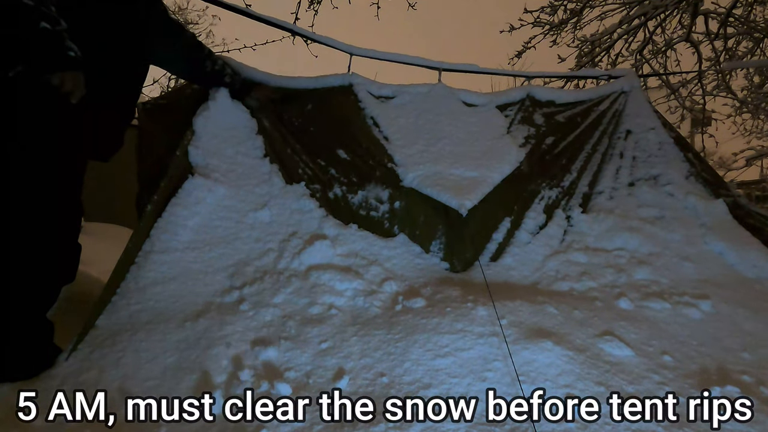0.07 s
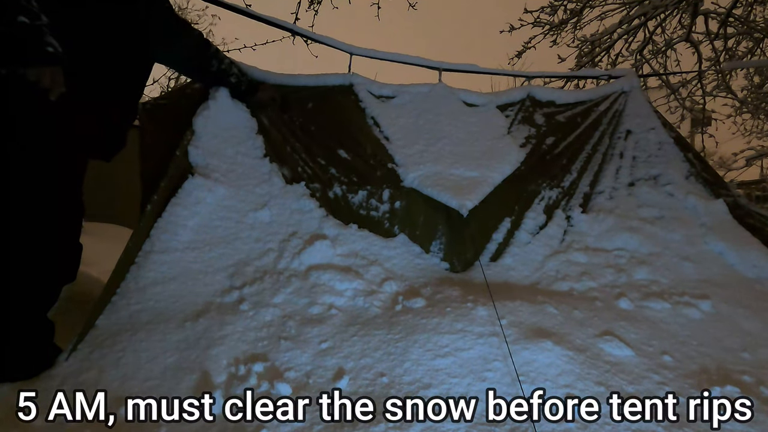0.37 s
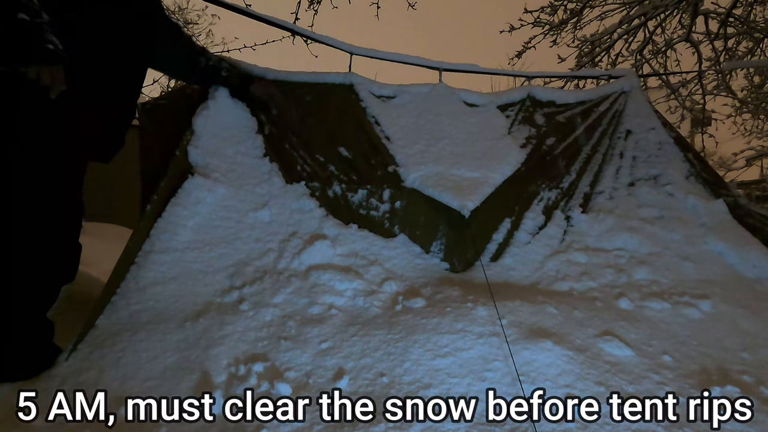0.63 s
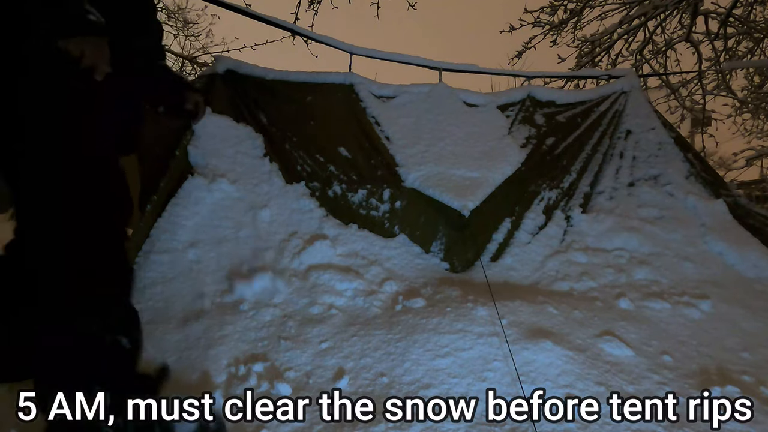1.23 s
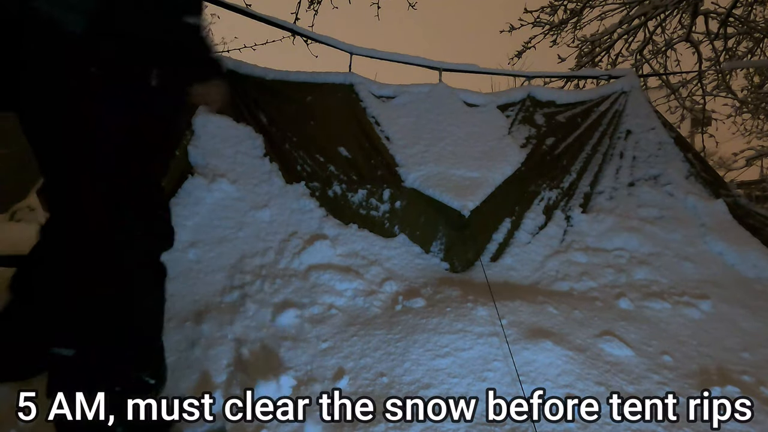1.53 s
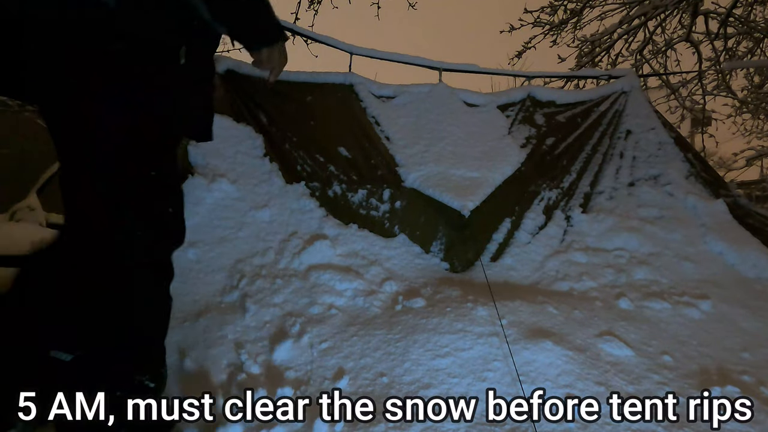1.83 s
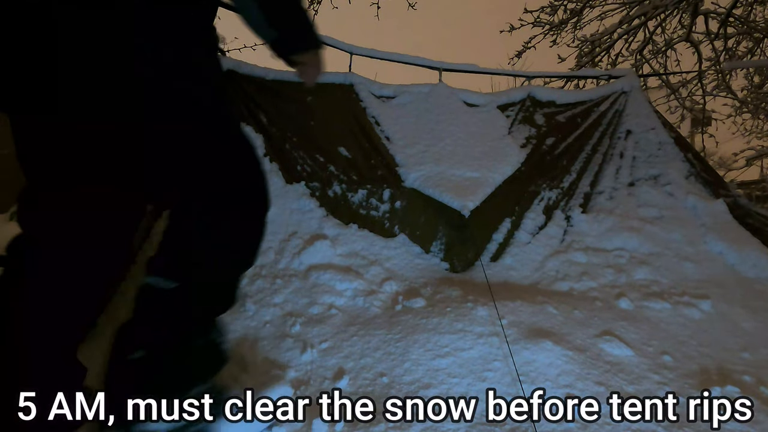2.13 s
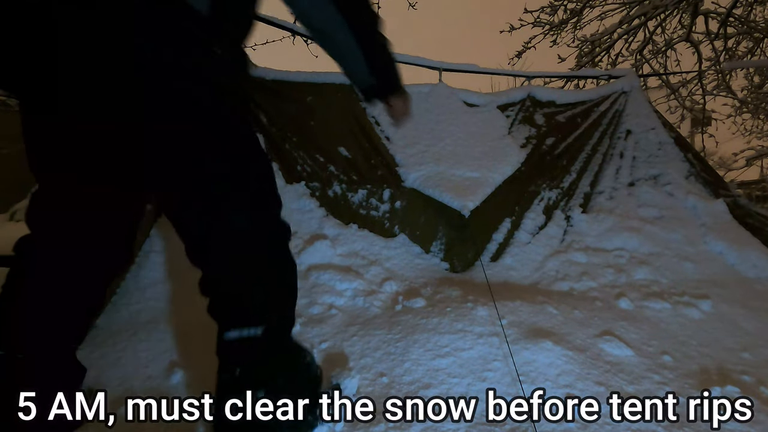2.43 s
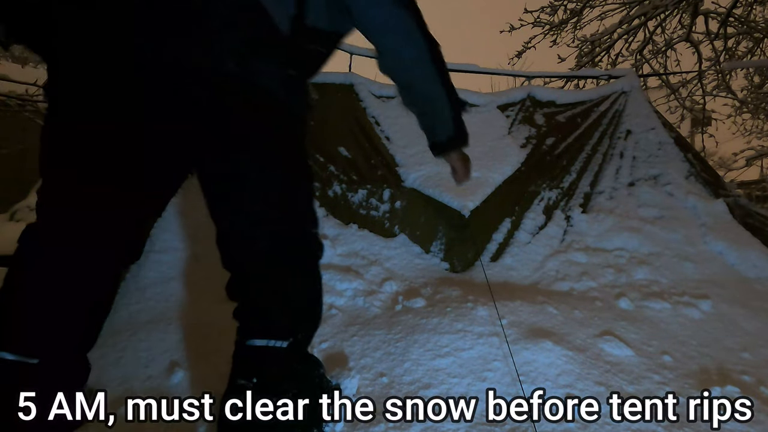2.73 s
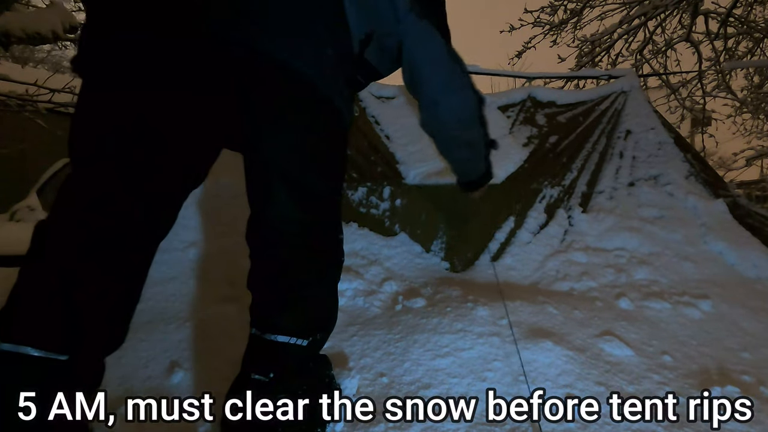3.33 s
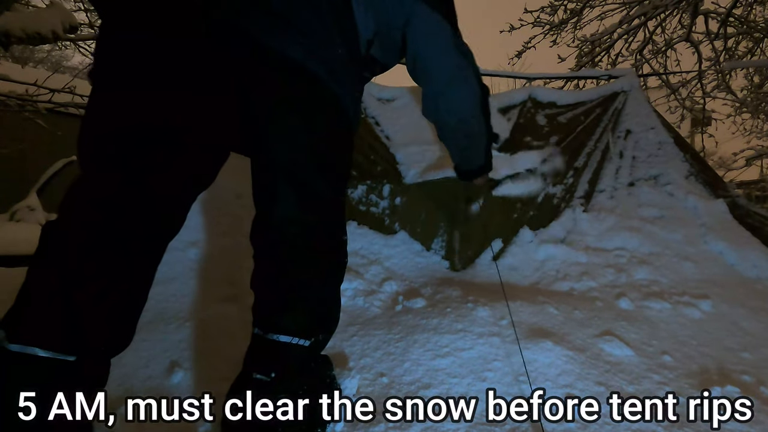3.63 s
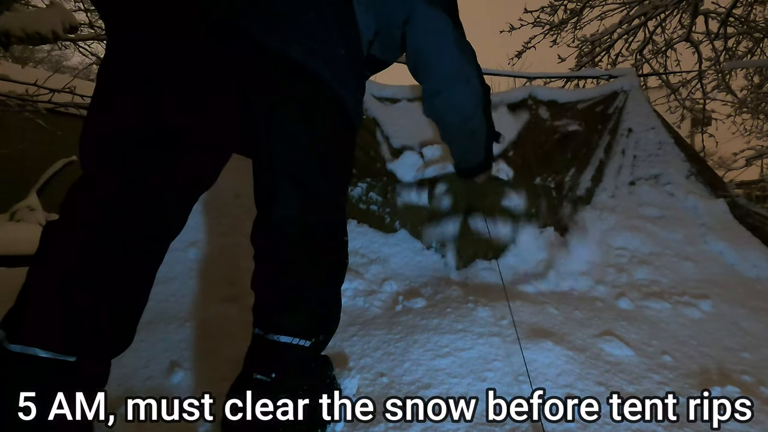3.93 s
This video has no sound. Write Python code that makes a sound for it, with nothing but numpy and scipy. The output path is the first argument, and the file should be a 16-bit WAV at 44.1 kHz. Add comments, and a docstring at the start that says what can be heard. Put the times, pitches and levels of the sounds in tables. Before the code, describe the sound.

A hand sweeps snow off a tent, the fabric rubbing and the grains hissing down. A few dull, crunchy steps in deep snow follow, then louder sweeps. Small ticks and crackles sound close by, over low outdoor wind.

```python
"""Snow hisses down a tent as a hand sweeps it off; a few steps through deep snow follow, then more sweeps.
The hand rubs and heaves the fabric, grains skitter over it and the sleeve rustles.
Boots pack the snow with dull, crunchy thuds; frozen crust and cloth crackle.
Small hard ticks come from near the walker, over a low wind rumble and a soft outdoor wash."""
import sys
import numpy as np
from scipy import signal
from scipy.fft import rfft, irfft
from scipy.io import wavfile

SR = 44100
rng = np.random.default_rng(int(sys.argv[2]) if len(sys.argv) > 2 else 0)


def digitize_waveform(pressure):
    """Quantize a signal to 16-bit integers and store it at the path in sys.argv[1].

    Rows of a 2-D input are taken as channels; values are limited to [-1, 1].
    """
    field = np.atleast_2d(pressure).T
    bounded = np.clip(field, -1, 1)
    quanta = np.round(bounded * 32767).astype(np.int16)
    wavfile.write(sys.argv[1], SR, quanta)


N = 176400
T = np.arange(N) / SR

# hand strokes on snowy cloth: (peak time [s], rise [s], fall [s], hiss level [dB], rub level [dB])
SWEEPS = [(.005, 0.062, 0.06, -46, -42.5), (.1, 0.036, 0.11, -47, -40), (.21, 0.027, 0.039, -50.5, -42.5),
          (.37, 0.14, 0.15, -53.5, -45.5), (0.626, 0.061, 0.074, -51, -46.5), (.8, 0.078, 0.16, -57, -50),
          (1.25, 0.19, 0.32, -65.5, -55), (1.47, 0.12, 0.053, -59.5, -52), (1.59, 0.034, 0.19, -65, -51),
          (2.027, 0.026, 0.022, -51.5, -50), (2.1, 0.046, 0.13, -61.5, -53), (2.52, .12, 0.13, -58, -52),
          (2.74, 0.043, 0.042, -60.5, -45), (3.05, 0.36, 0.25, -61, -52), (3.36, 0.067, 0.067, -53, -50),
          (3.489, 0.073, 0.084, -47, -40.5), (3.67, 0.077, 0.038, -43.5, -45),
          (3.762, 0.067, 0.064, -40.5, -37.5), (3.89, 0.076, 0.091, -41.5, -44.5),
          (3.99, 0.057, .08, -48.5, -41.5)]
# crisp sleeve rustles: (peak time [s], rise [s], fall [s], level [dB])
RUSTLES = [(.1, 0.089, 0.16, -60), (.38, 0.15, 0.08, -61), (.64, 0.025, .014, -61.5),
           (2.43, .04, 0.044, -70.5)]
# tone of the sliding grains, rubbed cloth, heaving wall and sleeve: (frequency [Hz], gain [dB])
HISS_EQ = [(1000, -25), (2200, 4), (3200, -3), (4000, -3), (4800, 2), (7400, -2.5), (8600, -9),
           (11000, -15), (12300, -19.5), (14000, -30), (16000, -47)]
RUB_EQ = [(60, -6), (150, 6), (280, -7.5), (520, 0), (1100, 2), (1800, 4.5), (2200, -1), (2900, -13),
          (5000, -14), (12000, -57)]
HEAVE_EQ = [(15, -11), (45, 8), (80, -3), (130, -5), (220, -14.5), (1000, -66)]
SLEEVE_EQ = [(3000, -27), (7500, 4), (12000, -5.5), (15500, -26)]


def sweeps():
    """The hand catches and slips, pushing the tent wall, while grains skitter and the sleeve rustles."""
    catch = wobble(rate_hz=50)  # one stick-slip flutter drives both hiss and rub
    hiss = colour(grains(per_s=14000, spread_db=1.0), HISS_EQ) * amp(1.16 * catch)
    rub = colour(grains(per_s=5000, spread_db=0.5), RUB_EQ) * amp(1.03 * catch)
    heave = amp(0.5) * colour(rng.standard_normal((2, N)), HEAVE_EQ)
    sleeve = colour(grains(per_s=3600, spread_db=5.5), SLEEVE_EQ) * amp(2.8 * wobble(rate_hz=90))
    hiss_level = swells((*timing, hiss_db) for *timing, hiss_db, _ in SWEEPS)
    cloth_level = swells((*timing, rub_db) for *timing, _, rub_db in SWEEPS)
    return hiss * hiss_level + (rub + heave) * cloth_level + sleeve * swells(RUSTLES)


# snow packing under a boot: (peak time [s], rise [s], fall [s], level [dB])
STEPS = [(1.487, 0.05, 0.039, -37), (1.592, 0.037, 0.029, -35), (2.1, 0.08, 0.031, -36.5),
         (2.585, 0.019, 0.063, -40), (2.745, 0.016, 0.023, -35), (3.208, 0.017, 0.0095, -36.5),
         (3.48, 0.031, 0.028, -38.5)]
# snow giving way: (time [s], thud level [dB], starting pitch [Hz], crust level [dB])
THUDS = [(1.476, -20, 140, -48), (1.52, -28, 109, -53), (1.573, -25, 168, -36.5), (1.597, -33.5, 172, -43),
         (1.632, -23, 141, -48), (2.057, -24, 83, -60), (2.129, -22.5, 163, -34), (2.553, -26.5, 126, -50),
         (2.588, -28, 191, -43.5), (2.638, -23.5, 113, -35.5), (2.72, -20, 192, -34),
         (2.763, -33, 198, -41), (2.772, -17.5, 124, -57), (3.197, -23, 89.5, -45),
         (3.751, -27, 226, -34.5)]
# tone of packing snow and of breaking crust: (frequency [Hz], gain [dB])
PACKING_EQ = [(30, 2), (110, 4.5), (320, -3), (600, -12), (1100, -14.5), (2500, -24), (8000, -39),
              (15000, -65)]
CRUST_EQ = [(100, -12), (350, 7), (700, 7.5), (1100, -1.5), (1800, -10.5), (3000, -23), (15000, -59)]
THUD_RISE_S, THUD_SAG_S, CRUST_FALL_S = 0.0026, 0.015, 0.0086
BOOM_HZ, BOOM_DB, BOOM_RISE_S = 51, -11, 0.021  # the low after-swing of each thud


def footsteps():
    """Snow packs in tiny collapses, then gives way in crunchy thuds that sink into a short low boom."""
    out = colour(grains(per_s=2500, spread_db=0.5), PACKING_EQ) * swells(STEPS)
    crust_level = np.zeros((1, N))
    t = np.arange(SR // 5) / SR
    push = pulse(t / THUD_RISE_S) + amp(BOOM_DB) * pulse(t / BOOM_RISE_S)
    crust_burst = (1 - np.exp(-t / 0.00011)) * np.exp(-(t / CRUST_FALL_S) ** 2)
    for s, thud_db, start_hz, crust_db in THUDS:
        pitch_hz = BOOM_HZ + (start_hz - BOOM_HZ) * np.exp(-t / THUD_SAG_S)
        thud = push / push.max() * np.sin(2 * np.pi * np.cumsum(pitch_hz) / SR)
        add(out, s, amp(thud_db) * thud)
        add(crust_level, s, amp(crust_db) * crust_burst)
    return out + crust_level * colour(grains(per_s=8900, spread_db=-3.5), CRUST_EQ)


# dry crackles: (time [s], level [dB], centre frequency [Hz])
CRACKLES = [(.415, -39, 9400), (1.478, -32.5, 2200), (1.576, -31.5, 1660), (1.657, -40, 6960),
            (1.687, -41, 2600), (1.808, -38, 2350), (1.824, -41, 2050), (2.1525, -36, 1020),
            (2.624, -32, 990), (2.696, -38, 2400), (2.6995, -30.5, 1970), (2.866, -38.5, 2860),
            (3.102, -38, 3120), (3.192, -29, 2460), (3.756, -30, 1580)]


def crackles():
    """Frozen crust and cloth crackle in single tiny fractures, a little to the left."""
    out = np.zeros((2, N))
    for s, db, centre_hz in CRACKLES:
        add(out, s, amp(db) * panned(crack(centre_hz), left_db=4))
    return out


def crack(centre_hz):
    """One dry fracture: a pulse that swells for 0.8 of a cycle and dies within a few more."""
    cycles = centre_hz * np.arange(SR // 20) / SR
    return pulse(cycles / .8) * np.sin(2 * np.pi * (cycles + rng.random()))


# the two hits of a double snap: (time [s], level [dB])
SNAPS = [(1.911, -41), (1.9156, -29)]
# tone of a snap: (frequency [Hz], gain [dB])
SNAP_EQ = [(700, -14), (930, 17), (1200, -12), (2200, 11.5), (3000, -7), (3800, -2), (5200, -11),
           (8000, -8.5), (10500, -23), (12000, -9), (14000, -38)]
SNAP_ATTACK_S, SNAP_DECAY_S = 0.00018, 0.0029


def snaps():
    """Two bright puffs of noise land almost together as one sharp snap."""
    out, t = np.zeros((2, N)), np.arange(SR // 20) / SR
    tone = amp(read(SNAP_EQ, np.fft.rfftfreq(len(t), 1 / SR)))
    for s, db in SNAPS:
        noise = irfft(rfft(rng.standard_normal(len(t))) * tone, len(t))
        puff = noise * (1 - np.exp(-t / SNAP_ATTACK_S)) * np.exp(-t / SNAP_DECAY_S)
        add(out, s, amp(db) * panned(puff / abs(puff).max(), left_db=3.5))
    return out


# small hard contacts: (time [s], level [dB], brightness tilt [dB/octave])
TICKS = [(.468, -30, 6), (.701, -37.5, -4), (.775, -43.5, -14), (.983, -42.5, -10), (1.233, -40, 2),
         (1.851, -34, -7.5), (2.585, -36.5, 3), (2.641, -36.5, 12.5)]
# the ring of a tick: (frequency [Hz], gain [dB], time to fade 60 dB [s])
TICK_MODES = [(2054, -2.5, 0.017), (3526, -4.5, 0.012), (3784, -12.5, 0.016), (4750, -15, 0.007),
              (7300, -26, 0.013)]


def ticks():
    """Small hard contacts on the walker's side click and ring a few short modes, differently each time."""
    out, t = np.zeros((2, N)), np.arange(SR // 20) / SR
    hz, mode_db, t60 = np.transpose(TICK_MODES)[:, :, None]
    for s, db, tilt in TICKS:
        detune, phase, damping = rng.standard_normal((3, len(hz), 1))
        strike_db = mode_db + tilt * np.log2(hz / hz[0])
        fade_db = 60 * t / t60 * np.exp(.3 * damping)
        modes = amp(strike_db - fade_db) * np.sin(2 * np.pi * (hz * (1 + .018 * detune) * t + phase))
        ring = modes.sum(0) * (1 - np.exp(-t / .0007))
        click = amp(-10.5) * crack(centre_hz=4000)
        add(out, s, amp(db) * panned(ring / abs(ring).max() + click, left_db=11))
    return out


# swell of the wind: (time [s], level [dB])
GUSTS = [(0, -45), (.9, -40.5), (1.85, -43.5), (2.35, -41.5), (2.8, -38.5), (3.1, -44), (3.4, -40.5),
         (4, -41.5)]
# tone of the wind and of the outdoor wash: (frequency [Hz], gain [dB])
WIND_EQ = [(10, -12), (36, -1.5), (54, 3.5), (72, -3.5), (110, -8), (160, -17), (220, -13.5), (320, -20.5),
           (2000, -76)]
WASH_EQ = [(30, 10), (250, 1), (800, -1), (1400, -2.5), (2000, -6), (2900, -17), (5000, -19), (7400, -22),
           (9000, -28), (12000, -33), (16000, -60)]
WASH_DB = -48.5


def outdoors():
    """The background bed: wind rumbles in slow gusts under a soft, flickering wash."""
    rumble = colour(rng.standard_normal((2, N)), WIND_EQ)
    gust_db = np.interp(T, *np.transpose(GUSTS)) + 0.63 * wobble(rate_hz=0.67)
    wash = colour(rng.standard_normal((2, N)), WASH_EQ) * amp(WASH_DB + 1.3 * wobble(rate_hz=41))
    return rumble * amp(gust_db) + wash


# stereo width of the textures: (frequency [Hz], left-right correlation [0 to 1])
CORRELATION = [(250, .97), (500, .9), (1000, .88), (2000, .86), (3000, .66), (4000, .4), (4900, .93),
               (8000, .94), (12000, .58)]
# their stereo lean: (frequency [Hz], left minus right [dB])
BALANCE = [(200, 0), (600, .9), (1400, -.2), (2200, -2.6), (2900, -5.2), (4000, -6), (4500, -2.7),
           (5300, -.6), (9000, .6)]


def colour(pair, eq):
    """Equalises two unrelated signals and spreads them as mid and side into stereo of rms 1."""
    hz = np.fft.rfftfreq(N, 1 / SR)
    a, b = rfft(pair) * amp(read(eq, hz))
    alike, lean = read(CORRELATION, hz), amp(read(BALANCE, hz) / 2)
    mid, side = a * np.sqrt(1 + alike), b * np.sqrt(1 - alike)
    return unit(irfft(np.array([(mid + side) * lean, (mid - side) / lean]), N))


def grains(per_s, spread_db):
    """Two trains of tiny impacts of uneven size."""
    size = amp(spread_db * np.minimum(rng.exponential(1, (2, N)), 4))
    return size * rng.standard_normal((2, N)) * (rng.random((2, N)) < per_s / SR)


def swells(strokes):
    """Envelope of overlapping bell-shaped strokes, summed in power."""
    return np.sqrt(sum(amp(db) ** 2 * np.exp(-2 * ((T - s) / np.where(T < s, rise, fall)) ** 2)
                       for s, rise, fall, db in strokes))


def pulse(age):
    """Envelope that peaks at 1 when age is 1, then dies away."""
    return age * np.exp(1 - age)


def wobble(rate_hz):
    """Random modulation of rms 1, rolled off above rate_hz."""
    hz = np.fft.rfftfreq(N, 1 / SR)
    return unit(irfft(rfft(rng.standard_normal(N)) * np.exp(-(hz / rate_hz) ** 2), N))


def panned(sound, left_db):
    """Pans a sound so that the left is left_db louder than the right."""
    return amp(left_db * np.array([[1], [-1]]) / 2) * sound


def add(mix, s, sound):
    """Adds a sound into the mix at time s."""
    part = mix[:, max(round(s * SR), 0):][:, :sound.shape[-1]]
    part += sound[..., :part.shape[1]]


def read(points, hz):
    """Reads a table on a log-frequency axis."""
    f, value = np.transpose(points)
    return np.interp(np.log(hz + 1), np.log(f + 1), value)


def amp(db):
    """Decibels to gain."""
    return 10 ** (np.asarray(db) / 20)


def unit(x):
    """Scales to rms 1."""
    return x / np.sqrt(np.mean(x ** 2) + 1e-20)


def scene():
    """Everything in the open air, with no echo."""
    return outdoors() + sweeps() + footsteps() + ticks() + crackles() + snaps()


# phase between the microphone ports: (frequency [Hz], lag of the left port [rad])
PORT_LAG = [(100, 0), (1000, .5), (2000, 1.15), (2850, 1.5), (3750, 1.4), (4100, 0)]
HIGH_CUT_HZ = 15600


def record(dry):
    """Two close microphone ports, out of phase in the mids, then a steep high cut."""
    lag = read(PORT_LAG, np.fft.rfftfreq(N, 1 / SR))
    ports = irfft(rfft(dry) * np.exp(.5j * np.array([-lag, lag])), N)
    high_cut = signal.firwin(511, HIGH_CUT_HZ, window=("kaiser", 9), fs=SR)
    return signal.oaconvolve(ports, high_cut[None], "same")


dry = scene()
out = record(dry)
digitize_waveform(out)
```